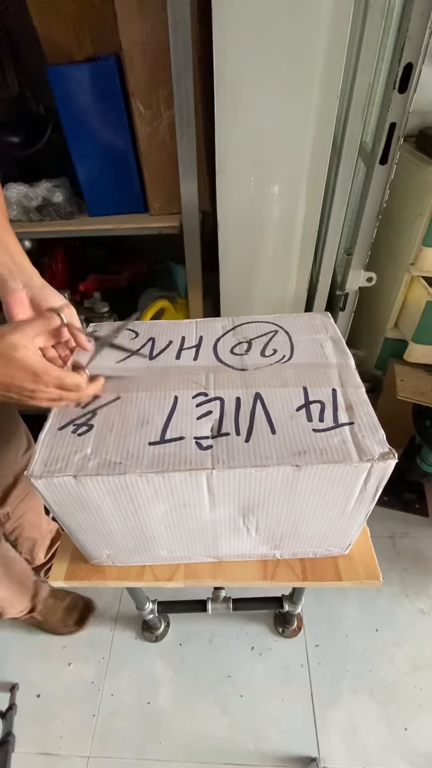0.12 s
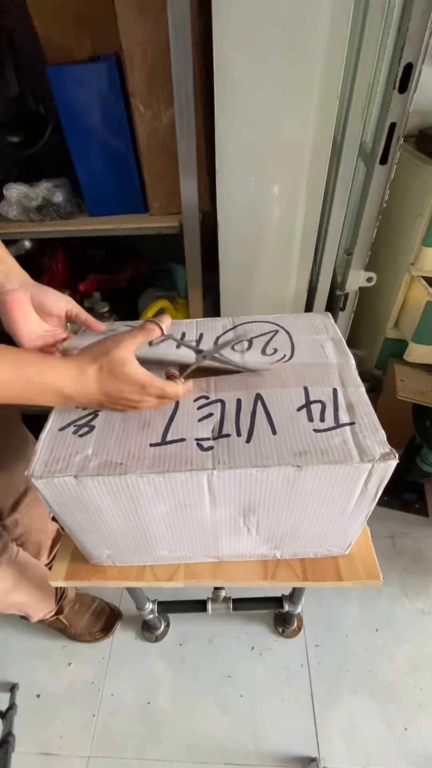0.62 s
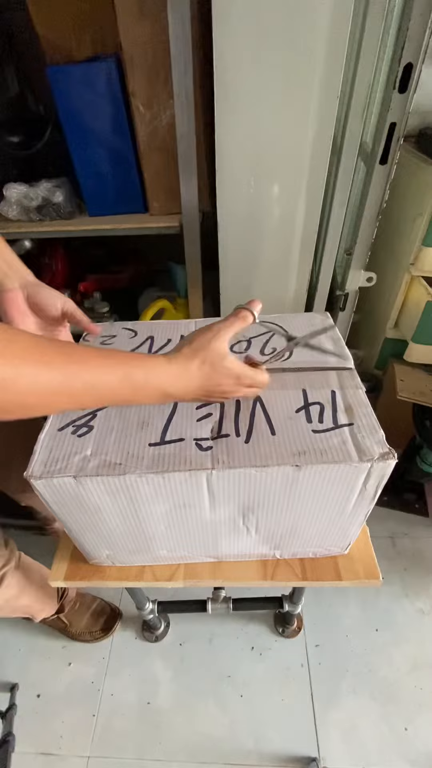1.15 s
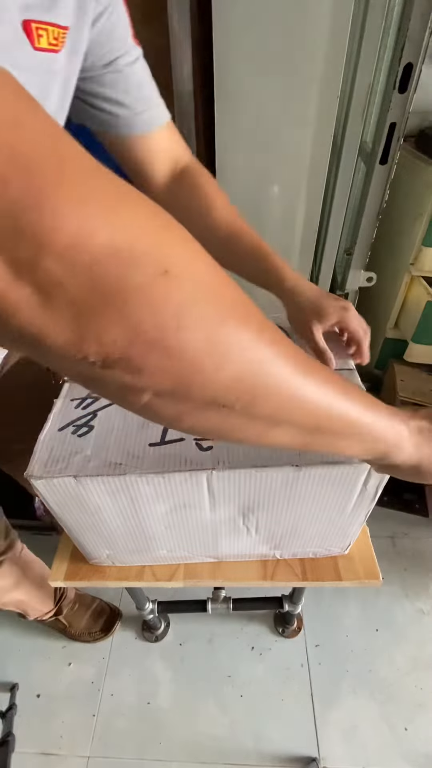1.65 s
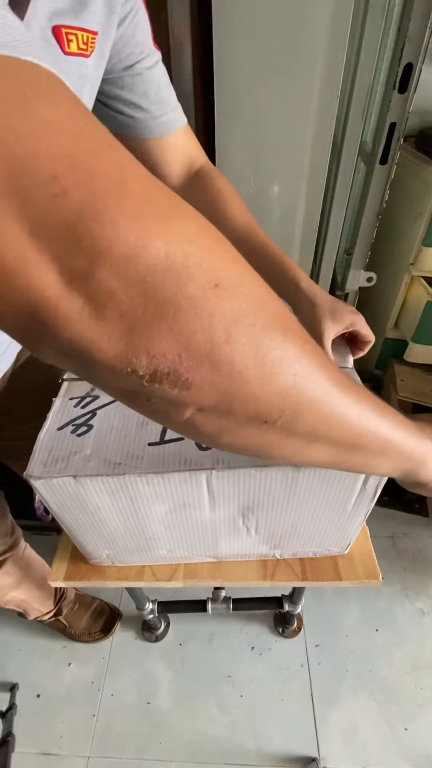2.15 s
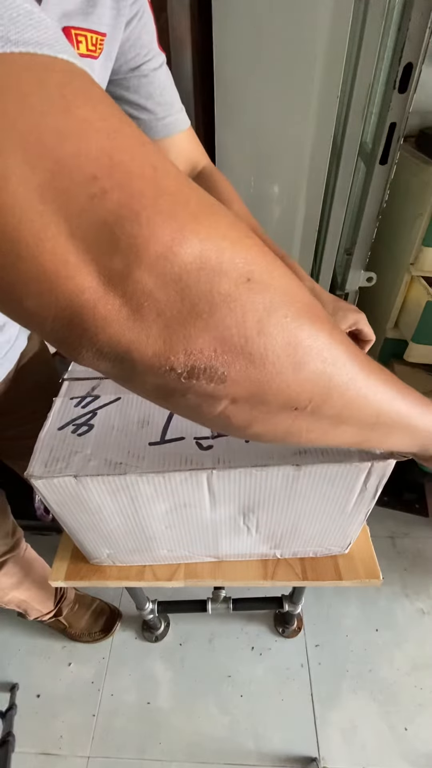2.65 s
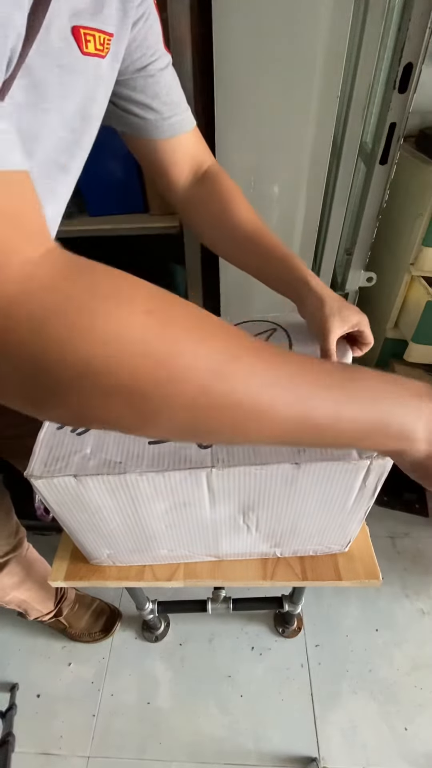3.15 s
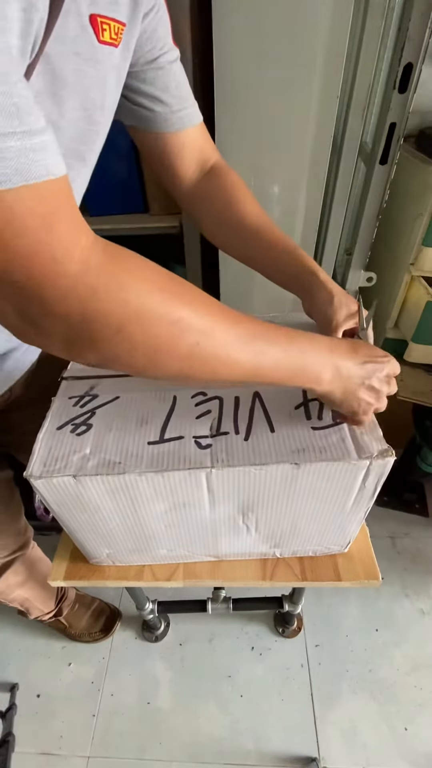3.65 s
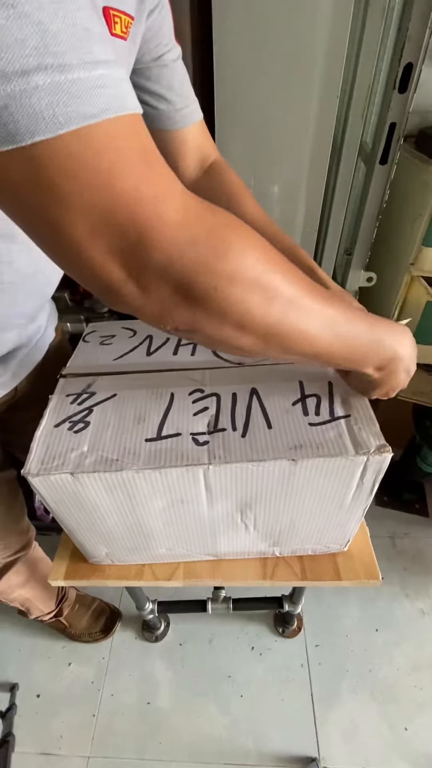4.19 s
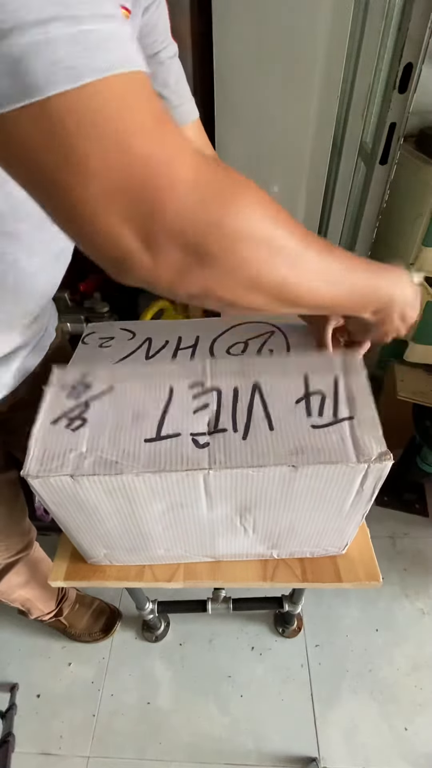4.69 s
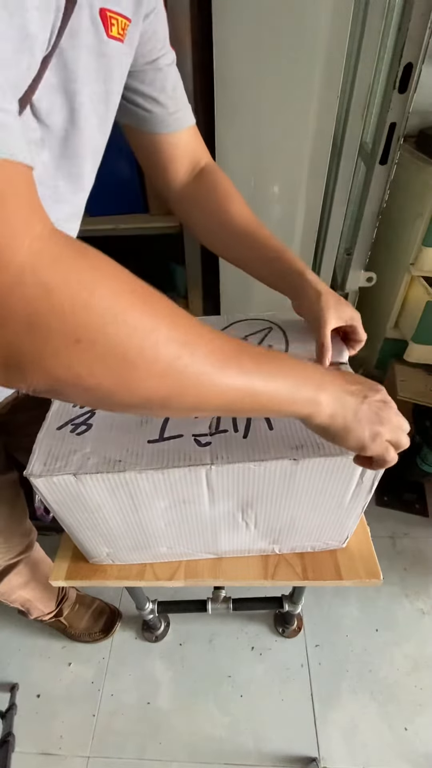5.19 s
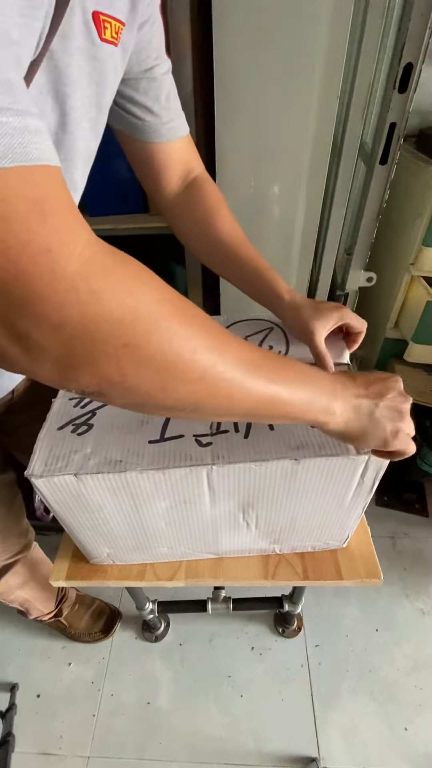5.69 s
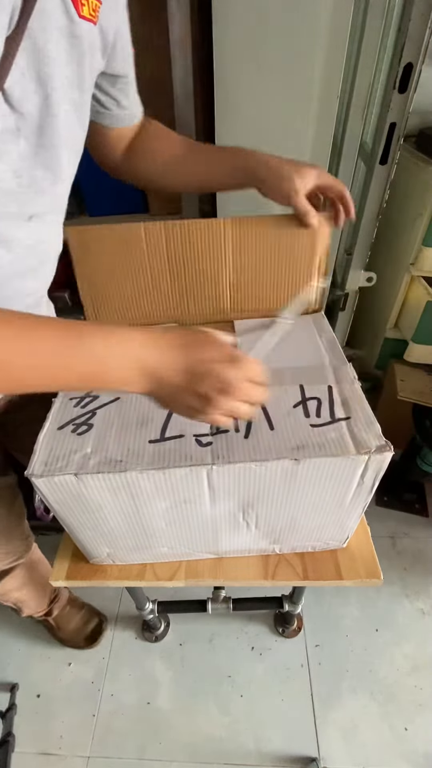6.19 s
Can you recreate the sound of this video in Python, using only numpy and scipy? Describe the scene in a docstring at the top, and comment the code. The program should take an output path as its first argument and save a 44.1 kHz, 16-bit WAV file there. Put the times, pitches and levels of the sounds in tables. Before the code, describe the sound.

A close stereo microphone hears hands opening a taped cardboard box in a small tiled room with short, bright echoes and soft low traffic rumble. At 0-0.15 s a quick tape rip crackles with hollow knocks and a scrape. From 0.5 to 0.65 s a rougher burst of tearing, snaps and boxy thumps follows; a sharp snap with a low thud lands at 0.9 s. A very faint low hum rises around 1-1.2 s. Handling thins, and a distant bird gives two warbling chirps at 1.9-2.4 s. Fingertip ticks, light rubbing and small crackles continue from 2 to 4 s, getting denser, with a firmer knock at 4.2 s. At 4.53 s comes the loudest moment: a violent tape rip and deep hollow boom. Near quiet follows until a creaking snap at 5.6-5.7 s, then short squeaks at 6.05 s and a swelling flap rub to the end, about 6.3 s.

```python
"""Tape tears and snaps, flaps rub and knock, and a hollow cardboard box booms in a small tiled room.
Hands slit and pull the tape: friction grains and sharp breaks excite the tape, the board and the box
modes, all heard close up with short echoes. A far bird chirps twice as warbling sines through a longer
echo, a brief hum glides by, and shaped noise makes the low room and traffic rumble."""
import sys
import numpy as np
from scipy import signal
from scipy.fft import rfft, irfft, next_fast_len
from scipy.io import wavfile
from scipy.ndimage import uniform_filter1d

SR = 44100
rng = np.random.default_rng(int(sys.argv[2]) if len(sys.argv) > 2 else 0)


def level_to_linear(level):
    """Convert decibel levels to linear amplitude factors, elementwise."""
    exponent = np.asarray(level, float) / 20
    return 10 ** exponent


def dump_mix(stems):
    """Bounce the given channels to the path in sys.argv[1] as a 16-bit WAV at rate SR."""
    frames = np.atleast_2d(stems).T  # one column per channel
    limited = np.clip(frames, -1, 1)  # hard clip at full scale
    pcm = np.round(limited * 32767).astype(np.int16)
    wavfile.write(sys.argv[1], SR, pcm)


N = 278712  # length in samples


def evened(x):
    """Normalisation: scales a signal to rms 1."""
    return x / np.sqrt(np.mean(x ** 2) + 1e-20)


def smoothed(x, size):
    """Low-pass by repeated averaging: two moving means along the last axis."""
    return uniform_filter1d(uniform_filter1d(x, size), size)


def read(points, hz):
    """Interpolation on a logarithmic frequency axis."""
    f, value = np.transpose(points)
    return np.interp(np.log(hz + 1), np.log(f + 1), value)


def add(mix, s, sound):
    """Superposition: adds a sound to the last axis of mix at time s."""
    part = mix[..., max(round(s * SR), 0):][..., :sound.shape[-1]]
    part += sound[..., :part.shape[-1]]


def colour(points):
    """Minimum phase: a causal impulse response of energy 1 with the given spectrum."""
    log_gain = np.log(level_to_linear(read(points, abs(np.fft.fftfreq(4096, 1 / SR)))))
    taps = np.fft.ifft(np.exp(np.conj(signal.hilbert(log_gain)))).real[:1024]
    return taps / np.linalg.norm(taps)


def grains(per_s, spread_db, smooth):
    """Stick-slip friction: fibres and glue let go as clicks of uneven size over a smooth hiss."""
    draw = rng.random(N)
    size = np.minimum(rng.exponential(1, N), 4)
    hiss = rng.standard_normal(N)
    clicks = (draw < per_s / SR) * level_to_linear(spread_db * size) * np.sign(hiss)
    return evened(evened(clicks) + smooth * hiss)


def resonate(x, hz, width):
    """Heterodyne resonance of gain 1: shifts the curve hz down to zero, smooths, and shifts back."""
    turn = np.exp(2j * np.pi * np.cumsum(hz * np.ones(len(x))) / SR)
    r = np.exp(-np.pi * width / SR)
    return 2 * (turn * signal.lfilter([1 - r], [1, -r], x / turn)).real


def glide(s, hz, db, warble_hz, warbles_per_s, crest_db):
    """Frequency and amplitude modulation: a sine along pitch and level curves, its pitch swinging fast."""
    t = np.arange(s[0], s[-1], 1 / SR)
    swing = np.sin(2 * np.pi * warbles_per_s * (t - s[0]))
    pitch_hz = np.interp(t, s, hz) + np.interp(t, s, warble_hz) * swing
    phase = 2 * np.pi * np.cumsum(pitch_hz) / SR
    level = np.sqrt(2) * level_to_linear(np.interp(t, s, db) + crest_db * swing)
    return s[0], level * np.sin(phase) * signal.windows.tukey(len(t), .1)


# Likeness of the two channels. Each row: frequency in Hz, left-right likeness from 0 to 1.
LIKENESS = [(100, 0.99), (300, 0.85), (700, 0.26), (1400, 0.12), (3000, 0.21), (6000, 0.72), (8300, .92),
            (11500, .9), (13000, 0.3), (15000, .75)]


def pair(a, b, hz):
    """Interchannel coherence: two channels from two random spectra, as alike as the table sets per frequency."""
    same = np.clip(read(LIKENESS, hz), 0, 1)[:, None]
    return np.array([a, same * a + np.sqrt(1 - same ** 2) * b])


# Spectrum of the rumble before its bass swells. Each row: frequency in Hz, relative density in dB.
RUMBLE_SPECTRUM = [(15, -36), (25, -31), (40, -10), (54, 6), (82, 6.5), (132, -10.5), (146, -19.5),
                   (464, -33), (511, -29.5), (650, -35.5), (911, -39.5), (1670, -46.5), (1840, -44),
                   (8000, -62), (10400, -80), (17600, -120)]
# Course of the bass. Each row: time in seconds, level in dB before it wanders.
TRAFFIC_LEVEL = [(0, -49.5), (1.8, -48.5), (2.8, -53.5), (4, -47), (6.3, -48.5)]


def rumble():
    """Filtered noise: room air and far traffic as random short-time spectra whose bass swells."""
    base_db, wander_db, bass_edge_hz = -36, 1.55, 170
    frames, hz = N // 512 + 5, np.fft.rfftfreq(2048, 1 / SR)
    a, b, c, d = rng.standard_normal((frames, 1025, 4)).T
    wander = evened(smoothed(rng.standard_normal(frames), 12))
    bass_db = np.interp(np.arange(frames) * 512 / SR, *np.transpose(TRAFFIC_LEVEL)) + wander_db * wander
    swell_db = (bass_db - base_db) / (1 + (hz[:, None] / bass_edge_hz) ** 4)
    patches = uniform_filter1d(rng.standard_normal((frames, 1025)).T, 6, axis=0)
    swell_db += 1.9 * evened(uniform_filter1d(patches, 8, axis=1))  # wandering patches
    z = level_to_linear(read(RUMBLE_SPECTRUM, hz))[:, None] * pair(a + 1j * b, c + 1j * d, hz)
    level = level_to_linear(base_db) / np.std(signal.istft(z, nperseg=2048, noverlap=1536)[1])
    return level * signal.istft(z * level_to_linear(swell_db), nperseg=2048, noverlap=1536)[1][:, :N]


# A brief low hum. The one row: start in seconds, end in seconds, start in Hz, end in Hz,
# start level in dB, end level in dB.
HUM_GLIDE = (.96, 1.245, 128, 133, -53, -48)


def low_hum():
    """Pure tone: one sine whose pitch and level rise along straight lines."""
    out = np.zeros(N)
    add(out, *glide(HUM_GLIDE[:2], HUM_GLIDE[2:4], HUM_GLIDE[4:], [0, 0], 0, 0))
    return out


def chirp(start, length, start_hz, end_hz, db):
    """Frequency modulation: one call swells, fades, climbs, and its warble narrows."""
    u = np.linspace(0, 1, num=12)
    knots = [0, 0.38, 1]  # start, top and end as shares of the call
    hz = start_hz + (end_hz - start_hz) * np.minimum(u / 0.39, 1)
    swing_share = np.interp(u, knots, [.1157, .1157, .07])
    swing_hz = hz * swing_share * (1 + .07 * rng.standard_normal(len(u)))  # the swing is uneven
    level_db = db + np.interp(u, knots, [-9.5, 0, -17])
    # louder at the top of each swing
    return glide(start + length * u, hz, level_db, swing_hz, warbles_per_s=33, crest_db=5.5)


# Calls of the bird. Each row: start in seconds, length in seconds, start in Hz, end in Hz,
# top level in dB before the warble's own swing.
BIRD_CALLS = [(1.939, 0.175, 3570, 3655, -47), (2.106, 0.28, 2376, 2685, -48)]


def far_bird():
    """Superposition: the calls of the bird on one line, without echoes."""
    out = np.zeros(N)
    for row in BIRD_CALLS:
        add(out, *chirp(*row))
    return out


# Decay of the echoes. Each row: frequency in Hz, 60 dB decay time in seconds before stretching.
ROOM_DECAY = [(100, 0.16), (300, 0.39), (1000, 0.39), (3000, 0.35), (7000, 0.4), (14000, 0.073)]


def room(x, stretch):
    """Reverberation: sparse taps of random sign, each band dying at its own speed."""
    taps = np.zeros((2, SR))
    at = np.arange(40, SR - 20, 10) + rng.integers(0, 10, (2, (SR - 51) // 10))
    np.put_along_axis(taps, at, rng.choice([-1., 1.], at.shape), 1)
    hz, t, z = signal.stft(taps, SR, nperseg=256)
    decay = level_to_linear(-60 * t / (stretch * read(ROOM_DECAY, hz))[:, None])
    tail = signal.istft(pair(*z, hz) * decay, SR, nperseg=256)[1]
    return signal.fftconvolve(x[None], tail / np.linalg.norm(tail[0]), axes=1)[:, :N]


def moving_room(x, stretch):
    """Time-varying reverberation: the hands move about, so three echo patterns take turns at even power."""
    turn = np.pi * np.arange(N) / SR / .06
    return sum(room(x * np.sqrt(2 / 3) * np.cos(turn + k * np.pi / 3), stretch) for k in range(3))


# Hands and flaps rubbing. Each row: time in seconds, speed of the rub in dB, load on the cardboard in dB.
RUB_COURSE = [(0.0, -76, -72), (0.122, -50, -47.5), (0.281, -60, -54), (.42, -68, -63.5), (0.528, -55, -49),
              (.66, -55.5, -46.5), (0.788, -58, -51.5), (.92, -67, -61.5), (1.07, -58.5, -56.5),
              (1.23, -63.5, -63.5), (1.41, -103, -94.5), (1.62, -62.5, -58), (1.99, -72, -63),
              (2.34, -67.5, -57.5), (2.45, -75, -60), (2.822, -63.5, -53.5), (3.19, -68, -59.5),
              (3.82, -101, -54.5), (4.099, -60, -52), (4.26, -71, -55), (4.49, -73, -60.5),
              (4.63, -52, -46), (4.77, -61, -51), (4.84, -75, -61), (5.53, -68, -58), (5.6, -67, -50.5),
              (5.7, -60.5, -55.5), (5.8, -64, -56), (5.93, -70, -65), (6.02, -67.5, -55.5),
              (6.035, -59, -61), (6.17, -54, -52.5), (6.2, -55, -58), (6.32, -48, -44.5)]


def rubbing():
    """Sliding friction: contact that wavers with the grip; speed makes hiss, load sounds the cardboard."""
    s, *columns = np.transpose(RUB_COURSE)
    speed_db, load_db = (np.interp(np.arange(N) / SR, s, c) for c in columns)
    air_db = speed_db + 4.5 - (load_db - speed_db)  # heavy, slow rubbing is duller
    waver_db = 2.5 * evened(smoothed(rng.standard_normal(N), 600))
    return level_to_linear(np.array([speed_db, load_db + 3, load_db - 8.5, air_db]) + waver_db)


# Fingertips on the bare board. Each row: time in seconds, level in dB.
FINGER_TICKS = [(.508, -40), (.895, -27.5), (1.894, -50), (1.929, -47), (2.109, -63), (2.151, -51.5),
                (2.191, -48.5), (2.24, -45.5), (2.281, -42.5), (2.335, -47.5), (2.396, -51), (2.404, -42.5),
                (2.437, -48.5), (2.58, -42), (2.652, -44.5), (2.612, -47), (2.682, -46), (2.697, -51),
                (2.709, -56), (2.736, -48), (2.8, -51), (2.852, -49), (2.898, -51), (2.972, -45),
                (3.017, -57), (3.155, -62), (3.18, -51), (3.198, -47.5), (3.202, -36.5), (3.441, -44.5),
                (3.634, -38.5), (3.669, -40.5), (3.793, -49), (3.851, -46), (3.864, -34), (3.929, -45),
                (3.968, -38), (4.048, -43), (4.26, -41), (4.28, -53), (4.343, -48), (4.483, -48),
                (4.494, -51), (4.684, -37), (4.69, -37), (4.755, -44), (4.877, -49), (5.023, -60.5),
                (5.628, -37.5), (5.69, -31)]
# Knocks on the box. Each row: time in seconds, level in dB, pitch of the struck panel in Hz.
BOX_KNOCKS = [(0.022, -28.5, 240), (.085, -20.5, 243), (0.328, -43, 260), (0.456, -35, 205),
              (0.515, -35, 260), (0.534, -21, 480), (.546, -25.5, 410), (.577, -22, 586), (.726, -44, 260),
              (0.804, -34.5, 240), (0.861, -35, 260), (0.87, -28.5, 260), (0.894, -46, 175),
              (.903, -23, 153), (1.204, -44.5, 296), (1.594, -38, 211.5), (1.63, -33.5, 404),
              (1.652, -44, 290), (1.798, -47.5, 260), (1.89, -38.5, 260), (1.909, -39.5, 260),
              (2.003, -36, 206), (2.584, -41, 420), (2.612, -44, 600), (2.642, -39.5, 400),
              (2.66, -40, 500), (2.69, -40, 332), (2.8, -44, 200), (2.889, -37, 205), (2.999, -35.5, 250),
              (3.139, -34.5, 197), (3.197, -36, 297), (3.332, -32, 288), (3.414, -39, 260),
              (3.56, -37, 260), (3.647, -35, 320), (3.672, -34.5, 225), (3.711, -38.5, 260),
              (3.808, -31, 298), (3.814, -39.5, 191), (3.851, -31, 290), (3.862, -32, 260),
              (3.879, -34, 260), (3.93, -33, 286), (3.969, -31.5, 296), (4.095, -35.5, 194),
              (4.228, -21.5, 282), (4.415, -38.5, 207), (4.535, -7.5, 288), (4.546, -13.5, 202),
              (4.574, -14, 216), (4.585, -23, 200), (4.684, -44, 403), (4.692, -40, 498), (4.739, -37, 260),
              (4.847, -37.5, 135), (4.88, -35, 162), (5.02, -44.5, 260), (5.048, -42, 260),
              (5.592, -48, 260), (5.629, -33.5, 498), (5.692, -25, 393), (5.936, -41.5, 168),
              (6.033, -40, 260), (6.062, -30.5, 320), (6.157, -34, 300)]


def ticks(grit):
    """Impulsive excitation: short dull taps drive the board, and the tape only faintly."""
    decay_ms, tape_db, knock_tick_db = 1, -24.5, -12.5
    drive, t = np.zeros((4, N)), np.arange(400) / SR
    knock_ticks = [(row[0], row[1] + knock_tick_db) for row in BOX_KNOCKS]  # every knock also ticks
    for s, db in FINGER_TICKS + knock_ticks:
        tap = evened(grit[round(s * SR):][:len(t)]) * np.exp(-t * 1000 / decay_ms)
        tap[0] += 6.
        add(drive, s, level_to_linear([[db + tape_db], [-99], [db], [-99]]) * tap)
    return drive


# Rings of stretched tape. Each row: frequency in Hz, width in Hz, relative level in dB.
TAPE_RINGS = [(1430, 120, -4), (1650, 100, 0), (2750, 90, -3), (3000, 250, -7), (4300, 300, -10),
              (5600, 600, -19)]


def creak(grit, start, end, per_s, db):
    """Stick-slip: stretched tape slips unevenly and rings fixed resonances."""
    x = grit[round(start * SR):round(end * SR)]
    turns = np.cumsum(per_s * (1 + 2.22 * uniform_filter1d(x, size=150))) / SR
    slips = np.exp(-(turns % 1) / 0.11) * (1 + x)
    rings = sum(level_to_linear(d) * evened(resonate(resonate(slips, hz, w), hz, 2 * w)) for hz, w, d in TAPE_RINGS)
    rings = rings * np.interp(turns / turns[-1], [0, .5, 1], [.7, 1, .5])
    return level_to_linear(db) * evened(rings) * signal.windows.tukey(len(x), .4)


# Tape and flap squeaks. Each row: start in seconds, length in ms, start in Hz, end in Hz, level in dB.
RUB_SQUEAKS = [(2.6, 104, 750, 900, -54.5), (4.1, 59, 2800, 3000, -57), (5.666, 20, 760, 920, -44),
               (6.035, 66, 330, 352, -44.5), (6.034, 34, 790, 780, -41), (6.069, 21.3, 704, 800, -38),
               (9.6, 37, 1500, 1150, -67), (6.083, 27, 930, 1100, -43.5), (6.179, 69, 6000, 8100, -48)]
# Thin, steady whines of sliding tape. Each row: start in seconds, length in ms, start in Hz, end in Hz,
# level in dB.
TAPE_WHINES = [(3.125, 50, 4200, 4200, -72), (3.195, 110, 3250, 3200, -69), (3.38, 150, 1600, 1560, -67),
               (4.3, 100, 1600, 1600, -68), (5.3, 190, 2050, 2150, -73), (4.84, 170, 3200, 3150, -74)]
# Creaks of stretched tape. Each row: start in seconds, end in seconds, nominal slips per second, level in dB.
TAPE_CREAKS = [(5.586, 5.616, 200, -59), (5.636, 5.686, 260, -44)]


def squeaks(grit):
    """Moving resonance: grains through a narrow gliding band squeak and whine; the creaks join them."""
    squeak_width, whine_width = .26, .025  # of each resonance pass, as share of the start pitch
    out = np.zeros(N)
    rows = [(*row, squeak_width) for row in RUB_SQUEAKS] + [(*row, whine_width) for row in TAPE_WHINES]
    for start, ms, start_hz, end_hz, db, share in rows:
        x = grit[round(start * SR):][:round(ms * SR / 1000)]
        hz = np.linspace(start_hz, end_hz, len(x))
        width = share * start_hz
        tone = evened(resonate(resonate(x, hz, width), hz, width))
        add(out, start, level_to_linear(db) * tone * signal.windows.tukey(len(x), .4))
    for row in TAPE_CREAKS:
        add(out, row[0], creak(grit, *row))
    return out


# Modes of the hollow box. Each row: frequency in Hz, relative level in dB, 60 dB decay time in seconds.
BOX_MODES = [(135, 10.5, 0.029), (187.8, 4, 0.047), (220, 1, 0.038), (228, 1.5, 0.032), (288, 1, 0.049),
             (338, -2, 0.048), (386.7, -5, 0.052), (480, -5, 0.065), (550, -12.5, 0.085), (615, -9, 0.049),
             (786, -19.5, 0.2), (883, -30.5, 0.18)]


def thud(near_hz, luck):
    """Modal excitation: one blow, peak 1, rings most the modes near the struck panel's pitch."""
    hz, db, t60 = np.transpose(BOX_MODES)[..., None]
    t = np.arange(5000) / SR
    reach_db = -8 * np.log2(hz / near_hz) ** 2 + 1.5 * luck[:, :1]
    phase = 2 * np.pi * (hz * (1 + 0.022 * luck[:, 1:2]) * t + 0.59 * luck[:, 2:])
    modes = level_to_linear(db + reach_db - 60 * t / t60) * np.sin(phase)
    build_up = (1 - np.exp(-t * hz / 0.83)) ** 2  # in cycles: high modes speak first, the boom follows
    sound = (modes * build_up).sum(0)
    return sound / abs(sound).max()


# Tape and fibre snaps. Each row: time in seconds, level in dB, ring in Hz, brightness in dB.
TAPE_SNAPS = [(0.0202, -32, 1000, -6), (0.0339, -30.5, 975, -17), (0.04, -29.5, 1550, -4),
              (0.071, -37, 740, -12.5), (0.079, -40, 3760, -9), (0.0818, -25.5, 870, -4),
              (0.085, -16.5, 2500, -10), (.112, -22.5, 2870, -22), (0.117, -26, 2020, -23),
              (0.3293, -35, 850, -1), (0.467, -42, 1600, -12), (0.507, -42, 1000, -9.5),
              (0.516, -38, 2597, -6), (0.526, -23.5, 860, -16), (0.5322, -20, 2570, -22),
              (0.5727, -15, 2800, -8), (0.5774, -30, 4500, -9.5), (0.6104, -35, 4200, 5),
              (0.6218, -31.5, 2600, -13), (0.6275, -26, 2600, -17), (.638, -41, 3500, -6.5),
              (0.702, -51, 758, 10), (0.727, -33.5, 835, -7), (0.7793, -37, 2500, -16),
              (0.859, -39, 738, -10), (0.872, -49, 840, -11), (0.8906, -17.5, 2220, -34),
              (1.126, -48, 3940, 5), (1.182, -36.5, 1620, -4), (1.2055, -38, 970, -1.5),
              (1.5923, -45.5, 810, -5), (1.6295, -31, 776, -8), (1.629, -33, 760, -30),
              (1.714, -43.5, 2980, 0), (1.798, -41.5, 770, 0.5), (1.909, -46, 756, -14),
              (1.9555, -44, 2500, 4), (2.0894, -49.5, 3820, 3), (2.279, -41.5, 2500, 7.5),
              (2.4677, -45, 770, -11), (2.585, -42.5, 2430, -26), (2.6396, -33, 830, -6),
              (2.652, -33.5, 5640, -25), (2.727, -55, 4500, 4), (2.755, -54, 6000, -1),
              (2.758, -57, 5500, 3), (2.7801, -34.5, 4600, -2), (2.835, -51.5, 4500, -20),
              (2.8787, -40, 4500, -20), (2.893, -40, 1550, -25), (2.919, -42, 4030, 1),
              (2.938, -41.5, 3410, -15), (2.982, -41.5, 4190, -17), (2.9961, -28.5, 1400, -13),
              (3.032, -44, 4560, -4), (3.2, -44, 970, -15), (3.3322, -37, 780, -13),
              (3.386, -55, 3000, -17), (3.396, -50, 4400, 8), (3.4056, -38, 4740, 7),
              (3.414, -45, 2640, 14), (3.537, -42.5, 1770, -15), (3.5584, -39, 775, -4),
              (3.5755, -46, 4500, -10), (3.595, -39.5, 2690, -2), (3.6044, -41, 2360, -23),
              (3.639, -35, 2440, 1), (3.645, -37, 4460, -12), (3.681, -33, 3200, -37),
              (3.749, -33, 2440, -22), (3.772, -44.5, 4000, 1), (3.848, -36.5, 800, -16),
              (3.865, -35, 850, -13), (3.879, -44, 900, -11), (3.929, -52, 2210, -13),
              (3.965, -55, 2400, -20), (3.973, -35, 6200, -23), (4, -55, 6000, 6), (4.047, -44, 1500, -10),
              (4.062, -38, 2410, 2), (4.065, -37, 6340, -8), (4.0723, -44, 2460, -5),
              (4.088, -39.5, 690, -10), (4.1258, -33.5, 2270, -0.5), (4.13, -29.5, 2310, -19),
              (4.2243, -29.5, 775, -14), (4.341, -61, 1060, 1), (4.427, -45, 745, -30),
              (4.4821, -31.5, 2260, -12), (4.4946, -31, 780, -13), (4.5322, -13.5, 800, -6.5),
              (4.532, -15, 2800, -10.5), (4.546, -16.5, 6300, -13), (4.573, -17, 990, -20),
              (4.682, -28.5, 4930, 3), (4.689, -41, 2980, -13), (4.74, -45, 3300, -3),
              (4.752, -42, 3530, -12), (4.779, -48, 1484, -15), (4.831, -50, 5900, 4),
              (4.874, -47, 1000, -10), (5.019, -46.5, 1040, -18), (5.052, -46, 780, -20.5),
              (5.205, -48, 3240, -4.5), (5.592, -51, 1590, -13.5), (5.627, -43.5, 1500, -12),
              (5.687, -20.5, 1340, -0.5), (6.031, -51.5, 1010, 7), (6.127, -47.5, 6000, 10),
              (6.154, -38, 1890, 3)]
# Hardest pulls jolting the stand under the box. Each row: time in seconds, level in dB before the soft onset.
STAND_JOLTS = [(0.905, -27), (4.55, -20), (4.577, -21)]
# Mode of the stand. The one row: frequency in Hz, 60 dB decay time in seconds.
STAND_MODE = (71, 0.16)


def thuds():
    """Impact response: every knock, the boom under every snap, and the jolts of the stand."""
    snap_boom_db, snap_boom_hz = -19, 260  # every snap also knocks the box a little
    out, t = np.zeros(N), np.arange(SR // 2) / SR
    blows = BOX_KNOCKS + [(row[0], row[1] + snap_boom_db, snap_boom_hz) for row in TAPE_SNAPS]
    for (s, db, hz), luck in zip(blows, rng.standard_normal((len(blows), len(BOX_MODES), 3))):
        add(out, s - .002, level_to_linear(db) * thud(hz, luck))
    stand_hz, stand_t60 = STAND_MODE
    for s, db in STAND_JOLTS:
        envelope = level_to_linear(db - 60 * t / stand_t60) * (1 - np.exp(-t / 0.0061))
        add(out, s, envelope * np.sin(2 * np.pi * stand_hz * t))
    return out


# Tape tearing without a break. Each row: start in seconds, end in seconds, start level in dB,
# end level in dB, load on the cardboard in dB where the pull is strongest.
TAPE_TEARS = [(0.061, 0.088, -47, -23, -23), (0.109, 0.125, -50, -35.5, -24.5),
              (0.508, 0.53, -54.5, -39, -44), (0.527, 0.57, -33, -52.5, -32.5),
              (0.574, 0.597, -28, -49.5, -20), (0.608, 0.637, -46, -40, -45),
              (0.65, 0.659, -48, -44.5, -44.5), (0.858, 0.885, -48.5, -44, -50),
              (0.895, 0.908, -34.5, -43, -40), (2.87, 2.9, -55, -53, -56), (2.966, 2.992, -58, -52, -69),
              (3.965, 3.973, -56, -63, -43), (4.53, 4.545, -22.5, -19.5, -22.5),
              (4.545, 4.603, -45, -76, -32), (5.652, 5.685, -65.5, -65, -41),
              (6.039, 6.106, -57.5, -49, -49)]


def tears():
    """Peeling: how hard ripping tape drives the tape, the box, the board and the brightest fibres."""
    box_against_board_db = -7
    drive = np.zeros((4, N))
    for start, end, start_db, end_db, load_db in TAPE_TEARS:
        u = np.linspace(0, 1, max(round((end - start) * SR), 9))
        pull_db = start_db + (end_db - start_db) * u
        board_db = load_db + pull_db - max(start_db, end_db)
        levels = level_to_linear([pull_db, board_db + box_against_board_db, board_db, pull_db])
        add(drive, start, levels * signal.windows.tukey(len(u), .15))
    clumps_db = 3 * evened(smoothed(rng.standard_normal(N), 70))  # glue lets go unevenly
    return drive * level_to_linear(clumps_db)


def snaps(grit):
    """Sudden release: one sharp break inside a short crackle rings the loose piece it comes from."""
    ring_width = .3  # share of the ring pitch
    swell_ms, swell_db = 17, -24.5  # a faint crackle swells before each snap
    drive, ring, t = np.zeros((4, N)), np.zeros(N), np.arange(2000) / SR
    u = t * 1000 / 3.48 * 5.05
    shape = (u * np.exp(1 - u / 2) / 2) ** 2  # peaks at 1 after about 1.4 ms
    swell = level_to_linear(swell_db) * np.linspace(0, 1, round(swell_ms * SR / 1000)) ** 2
    for s, snap_db, hz, bright_db in TAPE_SNAPS:
        air_db = snap_db + bright_db
        burst = np.zeros(len(t))
        add(burst, 0, grit[round(s * SR):])
        burst *= shape * np.linalg.norm(shape) / np.linalg.norm(burst * shape)
        burst = .7 * burst
        burst[np.argmax(shape)] += 5.  # the break itself
        add(drive, s, level_to_linear([[snap_db - 7.5], [-99], [snap_db - 21.5], [air_db]]) * burst)
        crackle = swell * grit[max(round(s * SR) - len(swell), 0):][:len(swell)]
        crackle_levels = level_to_linear([[snap_db], [-99], [snap_db - 5.5], [air_db]])
        add(drive, s - len(swell) / SR, crackle_levels * crackle)
        add(ring, s, level_to_linear(snap_db + 8.5) * resonate(burst, hz, ring_width * hz))
    return drive, ring


# Spectra of the tape, the bare board and the brightest fibres. Each row: frequency in Hz, relative level in dB.
TAPE_SPECTRUM = [(800, -46.5), (1500, -5), (2100, 4), (2800, 4.5), (4000, 2.5), (5000, 3), (6400, 2),
                 (7600, -1), (10000, -39.5)]
BOARD_SPECTRUM = [(300, -40), (550, -3), (750, 1), (950, 0), (1250, -9), (1700, -11), (2300, -16),
                  (3500, -40)]
AIR_SPECTRUM = [(6000, -40), (7800, -3), (9500, 1), (11000, -2), (13000, -8), (15500, -14), (17000, -26)]


def box():
    """Source and resonator: grains shaped by the hands ring the tape, the hollow box, board and fibres."""
    grit, fizz, slips = grains(3500, 3.6, .6), grains(1100, 4.8, 1.1), grains(700, 2.5, .4)
    drive, ring = snaps(grit)  # drive rows: tape, box, board, brightest fibres
    drive = drive + ticks(grit) + tears() * grit
    drive = drive + rubbing() * (fizz + level_to_linear(-15.0) * grains(66, 3.4, 0))  # a few lone fibres tick
    drive[2] += rubbing()[2] * level_to_linear(-3.0) * grains(260, 4.8, 0)  # corrugations click under the hand
    t = np.arange(5000) / SR
    boom = sum(level_to_linear(db - 60 * t / t60) * np.sin(2 * np.pi * hz * t) for hz, db, t60 in BOX_MODES)
    boom = boom / np.linalg.norm(boom)
    bodies = [colour(TAPE_SPECTRUM), boom, colour(BOARD_SPECTRUM), colour(AIR_SPECTRUM)]
    driven = sum(signal.oaconvolve(d, b)[:N] for d, b in zip(drive, bodies))
    return ring + thuds() + squeaks(slips) + driven


def scene():
    """Direct and reflected sound: near box with table and wall echoes, a bird by echoes only, hum, rumble."""
    near = box()
    table = level_to_linear(-11.5) * moving_room(near, stretch=0.1)[0]  # the same on both sides
    walls = level_to_linear(-6.5) * moving_room(near, stretch=0.63)
    return near + table + walls + room(far_bird(), stretch=1.57) + low_hum() + rumble()


def low_pass(x):
    """Removes everything above the highest recorded frequency."""
    return signal.sosfilt(signal.butter(12, 16860, fs=SR, output="sos"), x)


# Phase between the two channels, nearly opposite around 8 to 11 kHz.
# Each row: frequency in Hz, lead of the left in radians.
LEFT_LEAD = [(0, 0), (430, -.1), (780, .5), (1200, .15), (1720, .2), (2670, 1), (4050, .9), (4910, 2.3),
             (5430, 1.9), (6290, 1.5), (8400, 2.8), (10000, 2.8), (11500, 3.4), (13200, 4), (15400, 6),
             (16500, 6.2)]
# Level between the two channels. Each row: frequency in Hz, left minus right in dB.
LEFT_TILT = [(60, -1), (200, -2.5), (700, -3), (1290, -.5), (2380, -2.5), (4400, -4), (6500, -4), (8200, 0),
             (15000, 0)]


def record(dry):
    """Interchannel phase and level: two channels differ by frequency, lose deep bass and top, round peaks."""
    bass_hz, edge_hz, ceiling = 55, 15900, 1.1
    size = next_fast_len(N + 2048)
    hz = np.fft.rfftfreq(size, 1 / SR)
    half = level_to_linear(read(LEFT_TILT, hz) / 2) * np.exp(.5j * read(LEFT_LEAD, hz))  # half the difference a side
    response = hz ** 2 / (hz ** 2 + bass_hz ** 2) / (1 + (hz / edge_hz) ** 60)
    channels = irfft(rfft(dry, size) * response * np.array([half, 1 / half]), size)[:, :N]
    channels = ceiling * np.tanh(channels / ceiling)  # the input stage rounds off peaks
    return low_pass(channels)


dry = scene()
out = record(dry)
dump_mix(out)
```